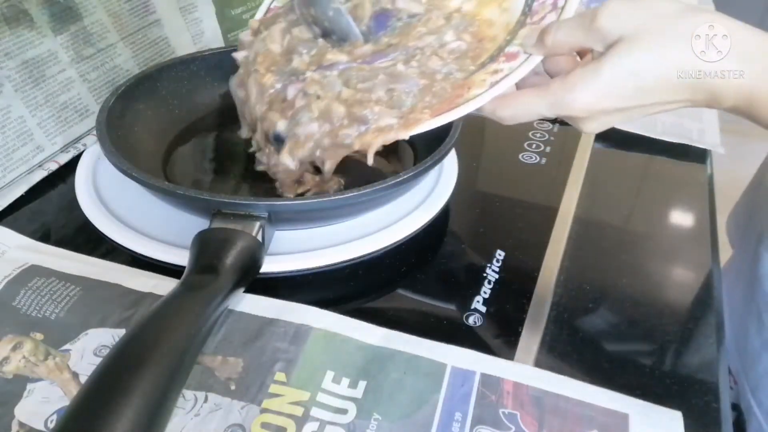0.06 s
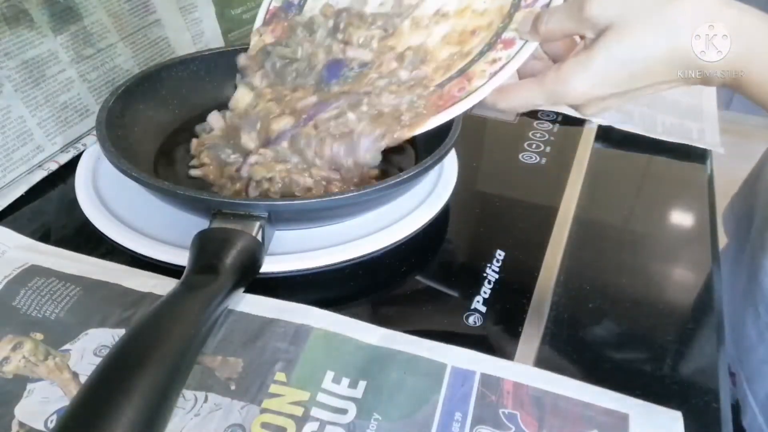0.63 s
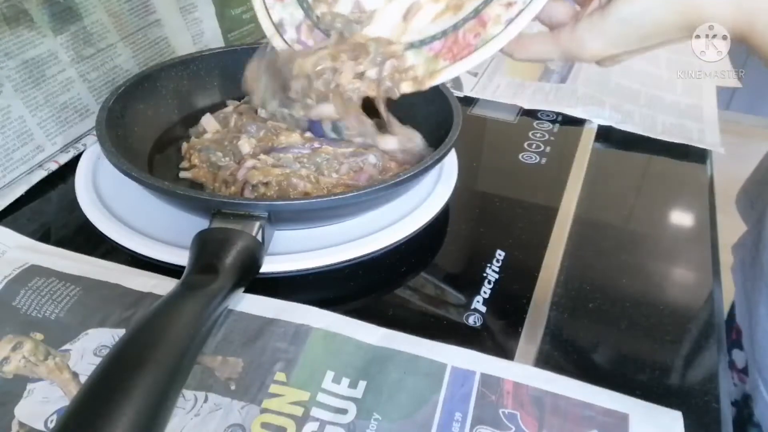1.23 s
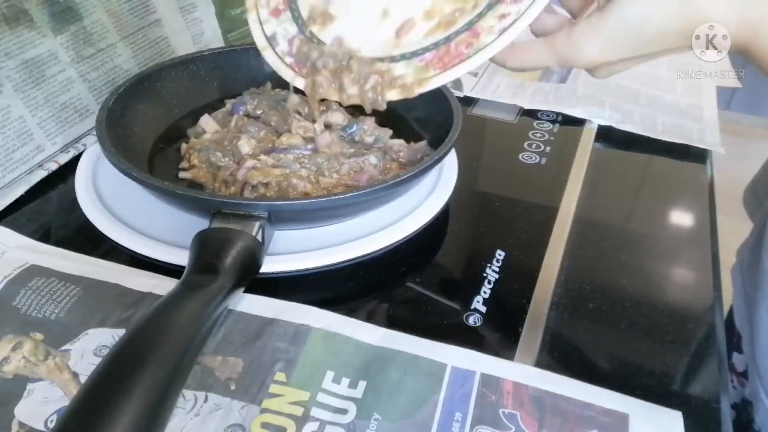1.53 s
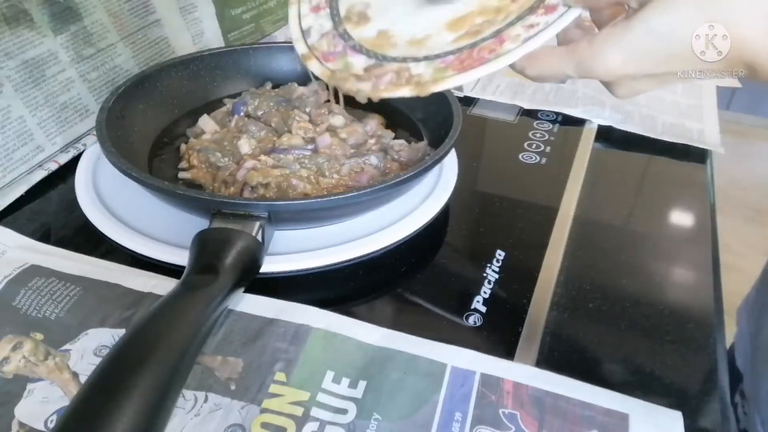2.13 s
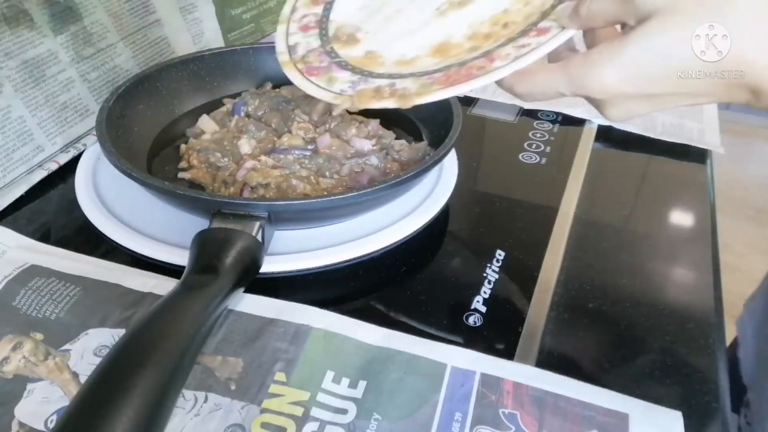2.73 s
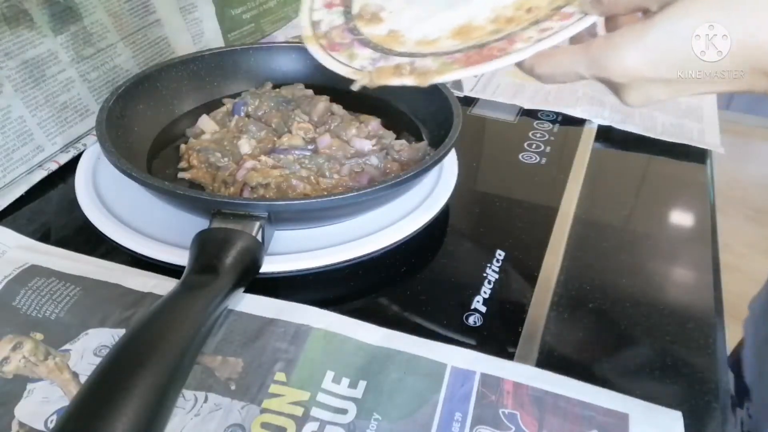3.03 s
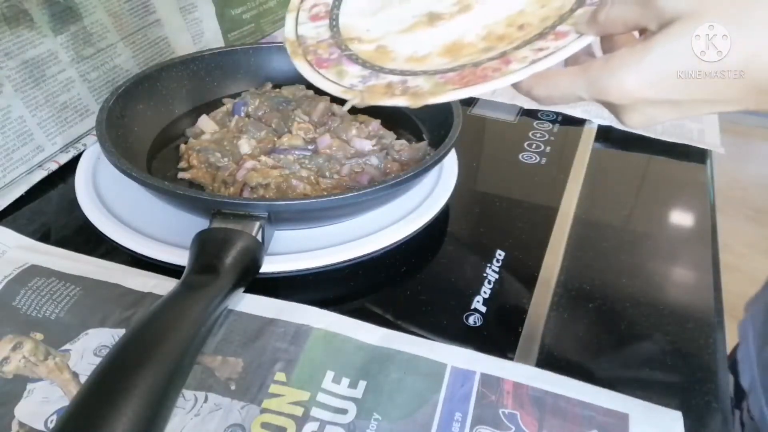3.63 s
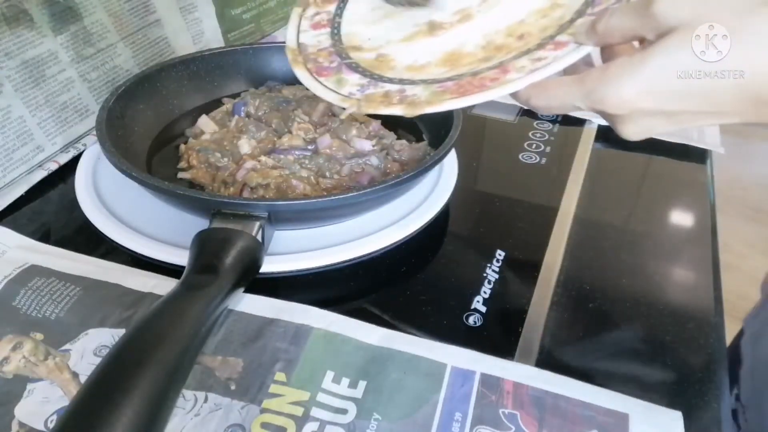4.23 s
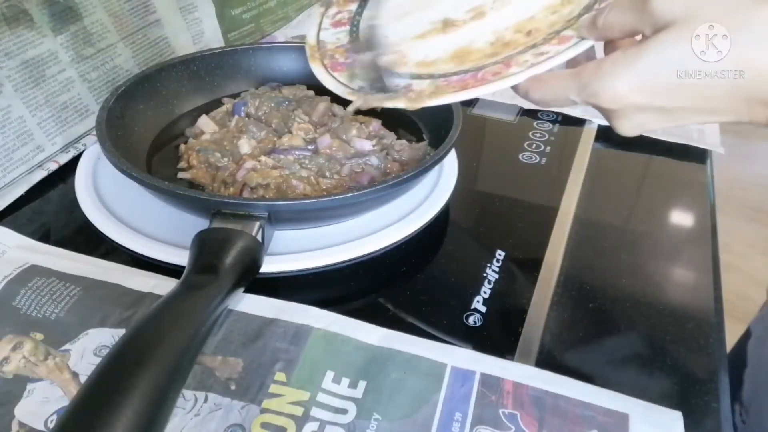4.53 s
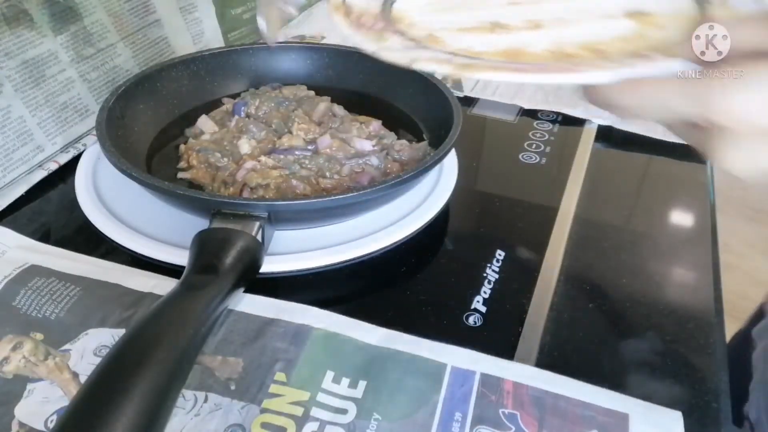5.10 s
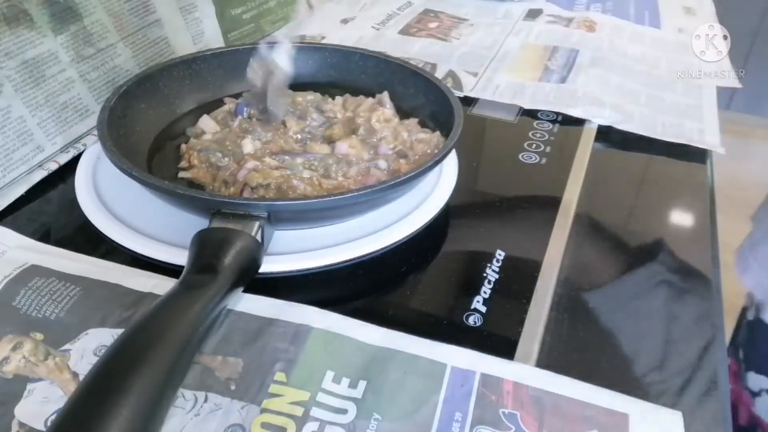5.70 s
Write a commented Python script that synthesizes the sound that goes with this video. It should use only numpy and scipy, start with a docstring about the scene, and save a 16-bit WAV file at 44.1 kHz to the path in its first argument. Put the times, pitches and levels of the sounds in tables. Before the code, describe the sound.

An appliance hums steadily and its fan whirs in a hard-walled kitchen. Close by, a metal spoon taps lightly on a ceramic plate as moist food squelches quietly into a pan. Brief scrapes and bright, quickly damped clinks follow as the plate is cleaned, with one clack of its rim against the pan. The clinking stops near the end, leaving the hum and a couple of faint ticks.

```python
"""In a hard-walled kitchen, an appliance hums and its fan whirs. A metal spoon pushes wet minced
food off a hand-held ceramic plate into a frying pan, then scrapes the plate clean. The food fizzes
and squelches; the spoon rasps, ticks and clinks; the plate's rim bumps the pan. The hand damps each
clink quickly, but the walls carry it on. Two microphone openings colour the sound differently,
and the volume ducks after loud clinks."""
import sys
import numpy as np
from scipy import signal
from scipy.fft import rfft, irfft, next_fast_len
from scipy.io import wavfile
from scipy.ndimage import uniform_filter1d

SR = 44100
rng = np.random.default_rng(int(sys.argv[2]) if len(sys.argv) > 2 else 0)


def bounce(signal):
    """Save signal as a 16-bit WAV file at the path given by the first command-line argument."""
    frames = np.transpose(np.atleast_2d(signal))
    limited = np.clip(frames, -1, 1)
    pcm = np.round(limited * 32767).astype(np.int16)
    wavfile.write(sys.argv[1], SR, pcm)


N = 258161
TIME = np.arange(N) / SR
TOP_HZ = 15300


def undb(db):
    """Turn decibels into a gain to multiply by."""
    return 10 ** (np.asarray(db) / 20)


def unit(x):
    """Scale a sound to an average power of 1."""
    return x / np.sqrt(np.mean(x ** 2) + 1e-20)


def colour(x, points):
    """Shape a sound's tone along a curve of (Hz, dB) points."""
    size = 2 * next_fast_len(x.shape[-1] // 2 + 2048)
    hz, db = np.transpose(points)
    freq = np.maximum(np.arange(size // 2 + 1) * SR / size, 1)
    cepstrum = irfft(np.log(undb(np.interp(np.log(freq), np.log(hz), db))))
    # fold the filter so that it never rings ahead of the sound
    cepstrum[1:size // 2] *= 2
    cepstrum[size // 2 + 1:] = 0
    return irfft(rfft(x, size) * np.exp(rfft(cepstrum)))[..., :x.shape[-1]]


def fade(t, ring_s):
    """Die away by 60 dB over the ring time."""
    return np.exp(-np.log(1000) * t / max(ring_s, 1e-4))


def wander(per_s):
    """A random curve, about 1 in size, that turns per_s times a second."""
    step = int(SR / per_s)
    stairs = np.repeat(rng.standard_normal(N // step + 1), step)[:N]
    return unit(uniform_filter1d(stairs, step))


def balance(db):
    """Left and right gains; a balance is left minus right in dB."""
    return undb(np.array([[.5], [-.5]]) * db)


def add(out, start_s, sound):
    """Mix a sound in at its start time."""
    i = int(start_s * SR)
    out[:, i:i + sound.shape[1]] += sound[:, :out.shape[1] - i]


def stereo_noise(count, alike):
    """Noise that is partly the same on the left and right."""
    noise = rng.standard_normal((3, count))
    return np.sqrt(alike) * noise[2] + np.sqrt(1 - alike) * noise[:2]


def through(x, response):
    """Let every sample of x set off the response."""
    return signal.fftconvolve(np.atleast_2d(x), response, axes=1)[:, :N]


def gesture(start_s, length_s, rise_s, sag_db_per_s, stop_s):
    """The loudness of one movement: it rises, sags steadily and stops."""
    t = TIME - start_s
    rise = np.clip(t / rise_s, 0, 1)
    fall = np.clip(1 - (t - length_s) / stop_s, 0, 1)
    return rise * fall * undb(-sag_db_per_s * np.clip(t, 0, length_s))


# The hum's tones. Each row: multiple of the hum's pitch, relative level in dB.
HUM_TONES = [(1, 1.64), (2, -34.5), (3, -34)]
# The hum swells and sinks a little. Each row: time in seconds, level in dB.
HUM_SWELL = [(0.25, -48.5), (0.7, -50), (2.68, -45), (3.07, -45), (5.47, -46), (5.7, -48.5)]
# The tone of fan and room air, then of its rumble. Each row: frequency in Hz, level in dB.
AIR_COLOUR = [(140, -10), (200, -2), (250, -8), (295, 1.5), (390, 1.5), (490, -9), (590, -13), (740, -21.5),
              (920, -10), (1850, -21), (3900, -50.5), (5600, -32), (7600, -33.5), (9600, -33.5),
              (15000, -44)]
RUMBLE_COLOUR = [(20, -27.5), (50, -14.5), (85, 0.5), (125, -0.5), (170, -10), (300, -44)]
# The fan housing's resonances. Each row: pitch in Hz, width in Hz, boost in dB.
FAN_HOUSING = [(200.5, 10, 4.5), (335, 17, 3), (381.5, 24, 1.5), (572.4, 23, 10), (917, 6.5, 5),
               (998, 13, 8.5)]


def appliance(hum_hz=100.09, air_db=-59.5, rumble_db=-62):
    """Mains power makes a wavering hum, and the fan's air resonates in its housing."""
    hum = sum(np.sqrt(2) * undb(db) * np.sin(2 * np.pi * k * hum_hz * TIME) for k, db in HUM_TONES)
    air = unit(colour(stereo_noise(N, alike=0.6), AIR_COLOUR))
    for hz, width, db in FAN_HOUSING:
        resonance = signal.lfilter(*signal.iirpeak(hz, hz / width, fs=SR), air)
        air = air + (undb(db) - 1) * resonance
    air[1] = np.interp(TIME - .00033, TIME, air[1])  # it reaches the right side later
    rumble = unit(colour(stereo_noise(N, alike=0.29), RUMBLE_COLOUR))
    hum_db = np.interp(TIME, *np.transpose(HUM_SWELL)) + 0.51 * wander(9.8)
    return hum * undb(hum_db) + unit(air) * undb(air_db + .5 * wander(16)) + undb(rumble_db) * rumble


def chirps(length_s, per_s, hz, octaves, cycles, glide, spread_db):
    """A swarm of tiny ringing grains around one pitch, each gliding up as it dies."""
    out = np.zeros((2, int(length_s * SR) + SR // 4))
    t = np.arange(SR // 40) / SR
    for when, pitch, size, bend, left, right in rng.random((int(per_s * length_s) + 1, 6)):
        grain_hz = min(hz * 2 ** (octaves * (pitch - .5)), TOP_HZ)
        turns = grain_hz * t * (1 + glide * bend * t / t[-1]) + np.array([[left], [right]])
        envelope = fade(t, cycles / grain_hz) * (1 - np.exp(-t * grain_hz / 3)) * (1 - t / t[-1])
        gain = undb(-spread_db * np.log(.03 + .97 * size))
        add(out, when * length_s, np.sin(2 * np.pi * turns) * envelope * gain)
    return out / np.sqrt(np.sum(out ** 2) / (2 * length_s * SR))


def squelch(hz):
    """One wet lump: a brief cluster of air pockets ringing around one pitch."""
    return chirps(0.02, per_s=700, hz=hz, octaves=1.11, cycles=31, glide=0.22, spread_db=2.3)


# The tone of the wet fizz. Each row: frequency in Hz, level in dB.
FIZZ_COLOUR = [(400, -10.5), (1000, -4.5), (2000, -3.5), (3200, -2), (3900, -13), (5000, -1), (6200, -7),
               (7500, -12.5), (10000, -20.5), (15000, -18.5)]
# Heaps slide off the plate; the last is stirred in the pan.
# Each row: start in seconds, length in seconds, level in dB.
HEAPS = [(0.12, .45, -76), (0.538, .75, -69), (1.247, 1.4, -69), (5.304, .6, -81.5)]
# Big lumps peel off and land. Each row: start in seconds, level in dB, air pocket pitch in Hz.
BIG_LUMPS = [(0.275, -71, 2370), (0.324, -67.5, 2400), (0.622, -68, 2060), (0.644, -64.5, 2800),
             (.885, -60.5, 1150), (1.066, -69, 2620), (1.128, -71.5, 3000), (1.4, -60.5, 1600)]


def food(resting_db=-78.5, lumps_per_s=14, lump_hz=2270, lump_db=-1.5):
    """Wet food tears away in a fizz of bursting films, and its lumps squelch."""
    films = chirps(N / SR, per_s=450, hz=3240, octaves=2.6, cycles=21.8, glide=.25, spread_db=1.9)
    fizz = unit(colour(films[:, :N] + undb(4.5) * stereo_noise(N, alike=0.2), FIZZ_COLOUR))
    slides = [undb(db) * gesture(start_s, length_s, rise_s=0.083, sag_db_per_s=4.5, stop_s=.15)
              for start_s, length_s, db in HEAPS]
    flow = np.max(slides, axis=0)
    small_lumps = np.zeros((2, N))
    for when, pitch in rng.random((int(lumps_per_s * N / SR), 2)):
        add(small_lumps, when * TIME[-1], squelch(lump_hz * 2 ** (pitch - .5)))
    # food lying in the pan keeps fizzing faintly
    fizz_gain = np.maximum(flow, undb(resting_db)) * undb(0.64 * wander(6.9))
    out = fizz * fizz_gain + small_lumps * flow * undb(lump_db)
    for start_s, db, hz in BIG_LUMPS:
        add(out, start_s, squelch(hz) * undb(db))
    return out


def strike(tones, ring_factor, crack_colour, rise_s):
    """One blow: a noisy crack plus ringing tones, with all ring times multiplied by ring_factor."""
    t = np.arange(SR // 4) / SR
    burst = stereo_noise(len(t), alike=0.06) * fade(t, .048 * ring_factor)
    sound = colour(burst, crack_colour) * undb(17)
    delay_s = np.array([[0], [.0001]])  # left, right
    for hz, db, ring_s in tones:
        hz = hz * (1 + 0.0033 * rng.standard_normal())  # spoon and grip shift the pitch each time
        phase = 2 * np.pi * (rng.random() - hz * delay_s) + .5 * rng.standard_normal((2, 1))
        gain = undb(db + 4 * rng.standard_normal())  # depends on where the blow lands
        sound += gain * fade(t, ring_s * ring_factor) * np.sin(2 * np.pi * hz * t + phase)
    return sound * (1 - np.exp(-t / rise_s))


# The plate's natural tones. Each row: pitch in Hz, level in dB, base ring time in seconds.
PLATE_TONES = [(550, -11, 0.037), (618, -16.5, 0.22), (1085, -11, 0.16), (1428, -0.5, 0.13),
               (1548, 3, 0.11), (1720, -6, 0.032), (2624, -6, 0.085), (2773, -7.5, 0.066), (3290, -7, 0.04),
               (4973, 4, 0.052), (5040, -9.5, 0.06), (5370, 1.5, 0.042), (5560, -0.5, 0.036),
               (5807, 5, 0.063), (6410, -3, .06), (6710, -1, 0.068), (8930, -7, 0.068), (9190, -4, 0.066),
               (9815, -1.5, 0.045), (10540, -5, 0.036), (11400, -1.5, 0.043), (14540, -10, 0.033)]
# The short crack of steel on glaze. Each row: frequency in Hz, level in dB.
GLAZE_CRACK = [(300, -13.5), (550, -8), (730, -13), (1300, -1.5), (2100, -3), (2700, -6.5), (3800, -12),
               (5000, -3), (6300, 5), (8100, -4), (9900, -2), (13200, -9), (15000, -11)]


def plate(ring_factor, bell_db, thud_db, crack_db, thud_top_hz=1300, bell_top_hz=2000):
    """A square blow bends the plate like a bell; a slow, heavy push wakes its low tones as a thud."""
    tones = [(hz, db + np.select([hz < thud_top_hz, hz < bell_top_hz], [thud_db, bell_db]), ring_s)
             for hz, db, ring_s in PLATE_TONES]
    crack = [(hz, db + crack_db + np.interp(hz, [thud_top_hz, 4500], [thud_db, 0]))
             for hz, db in GLAZE_CRACK]
    return strike(tones, ring_factor, crack, rise_s=.0007)


def slips(per_s, spread_db):
    """The spoon's edge slips in tiny random jolts of very unequal size."""
    sizes = undb(spread_db * np.minimum(rng.exponential(size=N), 4)) * rng.standard_normal(N)
    return unit(sizes * (rng.random(N) < per_s / SR))


# The spoon's strokes over the glaze. Each row: start in seconds, length in seconds, level in dB,
# dull drag of food in dB against the rasp, balance in dB.
SPOON_STROKES = [(0.361, 0.15, -73, -16, 7), (1.704, 0.098, -52.5, -15.5, -2),
                 (1.812, 0.099, -54.5, -9.5, -4), (1.962, 0.051, -57.5, -10, 5),
                 (2.954, 0.1, -49.5, -13, -1.5), (3.054, 0.074, -52, -4.5, -4),
                 (3.138, 0.09, -51, -16.5, -1.5), (3.284, 0.065, -54.5, -13.5, 3),
                 (3.776, 0.3, -55.5, -15.5, 1), (4.052, .05, -47, -8, 1.5), (4.67, 0.047, -50.5, -15, 5.5)]
# The tone of the rasp, then of food dragged under the spoon. Each row: frequency in Hz, level in dB.
RASP_COLOUR = [(400, -29.5), (1200, -21.5), (2600, -7), (3800, -12), (5500, -10.5), (9500, -2),
               (12000, -11), (15000, -2.5)]
FOOD_DRAG_COLOUR = [(300, -7.5), (700, -0.5), (1200, 6.5), (1700, 3), (2400, -14.5), (3600, -12),
                    (8000, -28)]
# The edge's squeaks. Each row: middle pitch in Hz, level in dB against the rasp.
EDGE_SQUEAKS = [(6000, -6), (10000, -5.5)]


def scrapes(stutter_per_s=120, stutter_db=2.5):
    """The spoon's edge catches and slips on the glaze, ringing the plate and squeaking."""
    rasp = 0
    for _ in range(4):
        jolts = slips(per_s=700, spread_db=2.2) * undb(4.5 * np.tanh(wander(40)))
        rasp = rasp + through(jolts, plate(ring_factor=.5, bell_db=-8, thud_db=0, crack_db=3))
    rasp = unit(colour(rasp, RASP_COLOUR))
    for hz, db in EDGE_SQUEAKS:
        squeaks = chirps(N / SR, per_s=170, hz=hz, octaves=.55, cycles=420, glide=.02, spread_db=2.97)
        rasp = rasp + undb(db) * squeaks[:, :N]
    drag = unit(colour(stereo_noise(N, alike=0.83) * undb(0.91 * wander(180)), FOOD_DRAG_COLOUR))
    pressure = undb(stutter_db * np.tanh(wander(stutter_per_s)))  # the edge sticks and frees itself
    out = np.zeros((2, N))
    for start_s, length_s, db, drag_db, balance_db in SPOON_STROKES:
        contact = gesture(start_s, length_s, rise_s=.018, sag_db_per_s=12, stop_s=.015) * pressure
        out += (rasp + undb(drag_db) * drag) * contact * undb(db) * balance(balance_db)
    return out


# Light touches of the spoon. Each row: start in seconds, level in dB, balance in dB.
SPOON_TICKS = [(0.4197, -41, -4.5), (0.4403, -47.5, 2), (0.4814, -47, 6.5), (0.495, -45.5, -4.5),
               (0.5555, -49, 5), (0.583, -48, 1), (0.712, -51.5, -6), (0.7905, -57.5, -6),
               (0.991, -54.5, -6), (1.277, -59, 17), (1.3715, -59, 0), (2.193, -56.5, 3), (2.454, -52, 4),
               (4.97, -61, 9), (5.3742, -62, -1.5)]
# The tone of a tick. Each row: frequency in Hz, level in dB.
SPOON_TICK_COLOUR = [(500, -16.5), (1500, -8.5), (3500, -8.5), (6000, 1), (8000, -3), (9700, 6),
                     (12000, -11), (15000, -9)]


def ticks():
    """Cushioned by food, the spoon makes only a short bright tick on the plate."""
    t = np.arange(SR // 25) / SR
    push = np.minimum(t / .0025, 1)
    out = np.zeros((2, N))
    for start_s, db, balance_db in SPOON_TICKS:
        tick = colour(stereo_noise(len(t), alike=0.13) * push * fade(t, 0.03), SPOON_TICK_COLOUR)
        add(out, start_s, tick / np.abs(tick).max() * undb(db) * balance(balance_db))
    return out


# The spoon lands on the plate. Each row: start in seconds, level in dB, boosts in dB for the
# middle bell tones, the low thud and the high sheen, balance in dB, ring time factor.
SPOON_CLINKS = [(1.6856, -41, -16, -23, -2.5, 1.5, 0.87), (1.73, -56, -7, 8.5, 0, 4, 0.67),
                (1.845, -51.5, 2.5, 2.5, -12, -4.5, 0.96), (1.9143, -47, -22, -8, 8.5, 2, 0.39),
                (1.9798, -58.5, -21, -5.5, 4.5, -5, 1.44), (2.4993, -48.5, -5, -7.5, 1, -0.5, 1.25),
                (2.8846, -29, -22, -13, 1, 0.5, 0.56), (2.9627, -49.5, -12, -17, 2.5, 8, .84),
                (2.9795, -53.5, 1, 9.5, 2, 0, 0.66), (3.07, -51, -11.5, -26.5, 5, 2, 0.62),
                (3.274, -56, -7, -19, 3, 3.5, 1.4), (3.358, -34, -7.5, -4.5, -1.5, 1.5, 0.8),
                (3.396, -53, 8.5, 10, -4, -3.5, 1.44), (3.7213, -31.5, 0.5, 1.5, 3, 5, 0.66),
                (3.8926, -53, -11, 1.5, -6, -2, 0.95), (4.0681, -44, -3.5, -6, -3.5, 0.5, 1.8),
                (4.0987, -38.5, -6.5, 0, -2, 1, 0.93), (4.4867, -33.5, 10, 1.5, 5, .5, 0.78),
                (4.684, -54, 2.5, -6, -13, -4, 0.52), (4.7308, -48, -22, -2.5, -2.5, 3, 1.03)]


def clinks():
    """The spoon rings the plate: bare glaze gives the most sheen, a firm grip the shortest ring."""
    out = np.zeros((2, N))
    for start_s, db, bell_db, thud_db, sheen_db, balance_db, ring_factor in SPOON_CLINKS:
        ring = plate(ring_factor, bell_db, thud_db, crack_db=0)
        clink = colour(ring, [(7000, 0.0034), (9000, sheen_db)])
        add(out, start_s, clink * undb(db) * balance(balance_db))
    return out


# The rim hits the pan. Each row: start in seconds, level in dB, balance in dB.
RIM_KNOCKS = [(2.2682, -39.5, -3), (2.2742, -43.5, -3.5), (2.298, -50.5, -5)]
# The pan's natural tones. Each row: pitch in Hz, level in dB, base ring time in seconds.
PAN_TONES = [(555, -1, 0.024), (825, -3, 0.11), (913, -5, .07), (1201, -22, 0.096), (1297, 5.5, 0.036),
             (1400, -2, .07), (2035, -4, 0.12), (2526, -2.5, 0.049), (3404, -5.5, 0.038), (4670, -5, 0.055),
             (5750, 4, 0.023)]


def knocks():
    """The plate's rim bumps the pan and chatters briefly."""
    crack = [(300, -13.5), (1100, 4), (3800, -13), (5500, 6.5), (10000, -5.5), (13000, -14)]
    out = np.zeros((2, N))
    for start_s, db, balance_db in RIM_KNOCKS:
        clack = strike(PAN_TONES, ring_factor=0.68, crack_colour=crack, rise_s=0.0016)
        add(out, start_s, clack * undb(db) * balance(balance_db))
    return out


# The kitchen's echo. Each row: frequency in Hz, ring time in seconds, relative level in dB.
KITCHEN_ECHO = [(200, 1, 8), (750, 0.97, 5.5), (1515, 0.7, -1.5), (3024, 0.57, 4.5), (5500, 0.55, -2.5),
                (9550, 0.54, -1), (15060, 0.3, 1.5)]


def kitchen(dry, echo_db=-6.5, first_wall_s=0.001):
    """Hard walls send back a smooth echo whose treble dies first."""
    t = np.arange(SR) / SR
    spectrum = rfft(rng.standard_normal((2, SR)))  # one value per Hz
    hz, ring_times, db = np.transpose(KITCHEN_ECHO)
    tail = 0
    for band_gains, ring_s in zip(np.diag(undb(db)), ring_times):
        band = irfft(spectrum * np.interp(np.arange(spectrum.shape[1]), hz, band_gains))
        tail = tail + band * fade(t, ring_s)
    tail = tail * np.clip(t / first_wall_s - 1, 0, 1)
    return dry + undb(echo_db) * through(dry, tail / np.sqrt(np.sum(tail ** 2) / 2))


def scene():
    """Spoon, plate and food echo in the kitchen, over the appliance's hum."""
    return kitchen(clinks() + knocks() + scrapes() + ticks() + food()) + appliance()


# The tone of the two microphone openings. Each row: frequency in Hz, left gain in dB, right gain in dB.
MIC_COLOUR = [(100, 1.8, -2), (197, 0, -1), (408, 4, -7.5), (694, 1.5, 3), (1494, -2, -4), (3540, 3.5, 2),
              (5000, 5.5, -1), (5820, 7.5, -6.5), (7040, -2, -7), (9690, -9, 9), (13050, -3.5, -2.5),
              (15000, -2, -2)]


def record(dry, duck_above_db=-24, duck_strength=0.15, release_s=0.32):
    """Each opening colours its side; the volume ducks after loud peaks; the highest treble is cut."""
    mics = np.array(MIC_COLOUR)
    heard = np.array([colour(dry[side], mics[:, [0, side + 1]]) for side in range(2)])
    # follow the peaks: jump up at once, then sink back slowly
    log_level = np.log(np.abs(heard).max(axis=0) + 1e-9)
    peak = np.exp(np.maximum.accumulate(log_level + TIME / release_s) - TIME / release_s)
    gain = np.minimum(undb(duck_above_db) / peak, 1) ** duck_strength
    ducked = heard * uniform_filter1d(gain, size=128)
    return signal.sosfilt(signal.ellip(10, .2, 80, TOP_HZ, fs=SR, output="sos"), ducked)


dry = scene()
out = record(dry)
bounce(out)
```